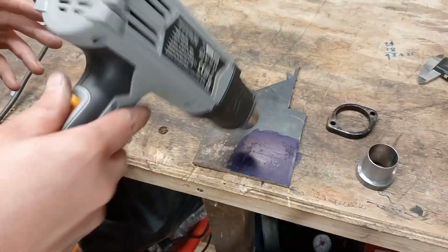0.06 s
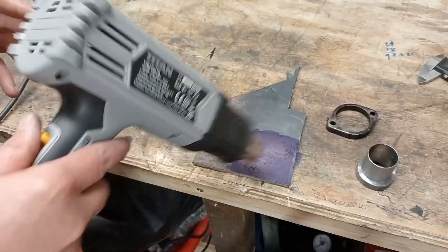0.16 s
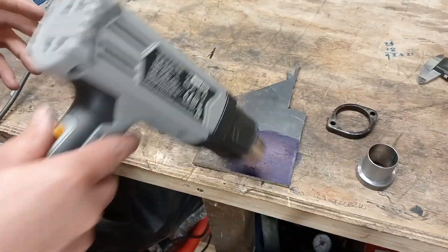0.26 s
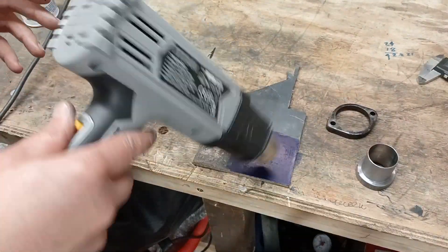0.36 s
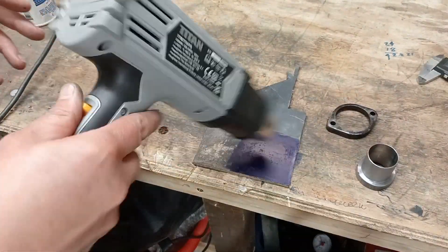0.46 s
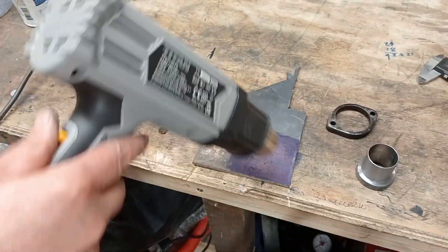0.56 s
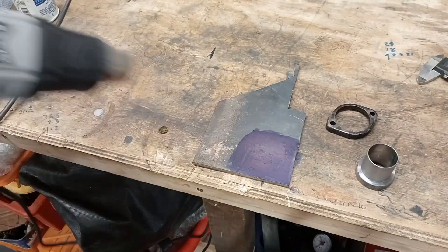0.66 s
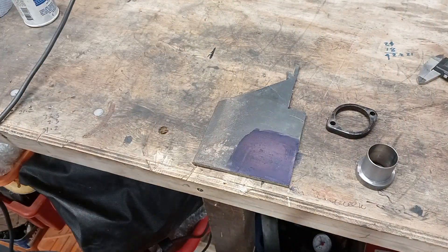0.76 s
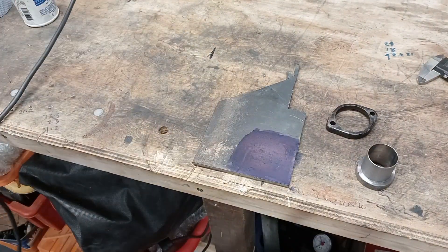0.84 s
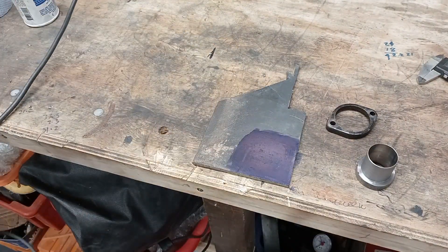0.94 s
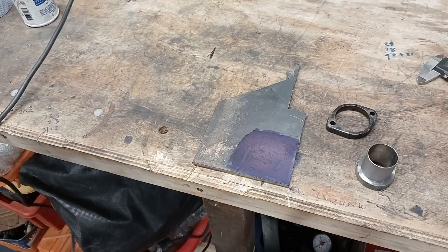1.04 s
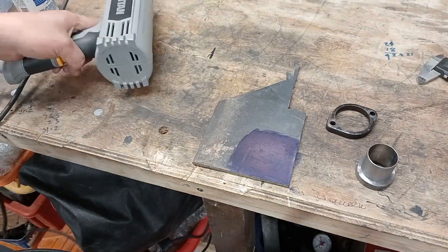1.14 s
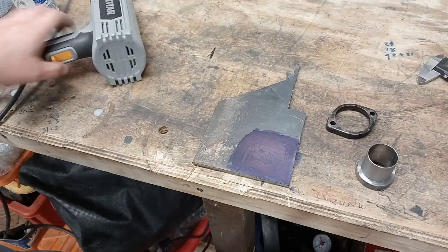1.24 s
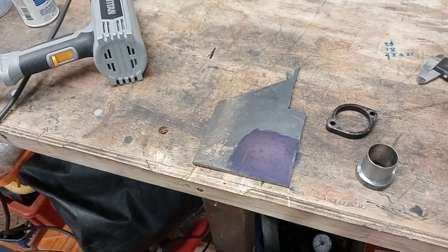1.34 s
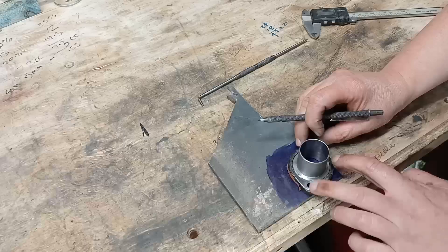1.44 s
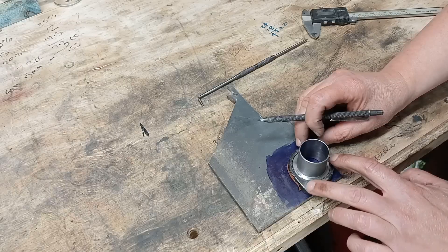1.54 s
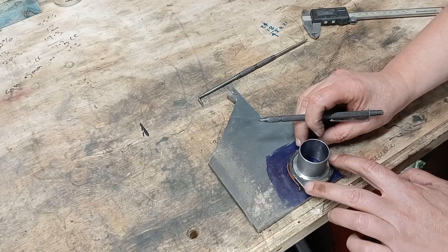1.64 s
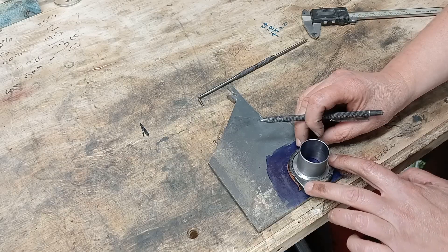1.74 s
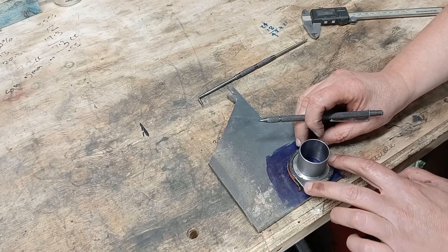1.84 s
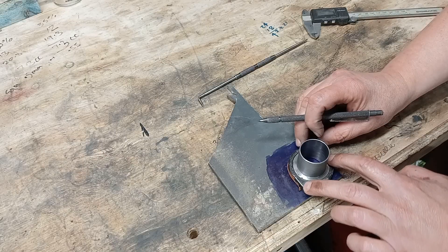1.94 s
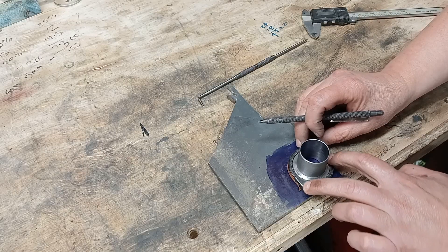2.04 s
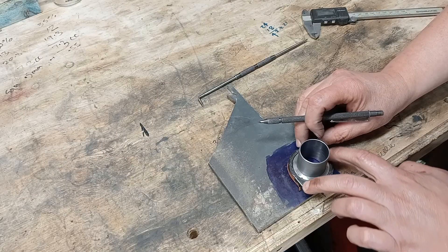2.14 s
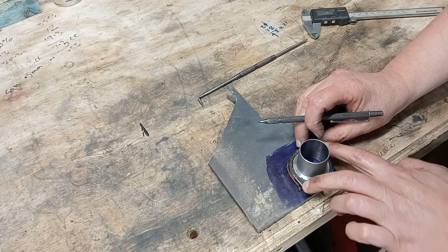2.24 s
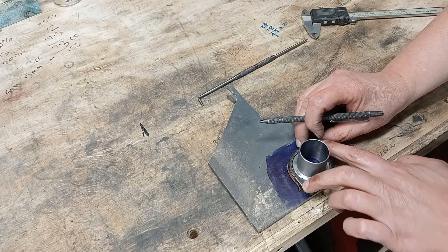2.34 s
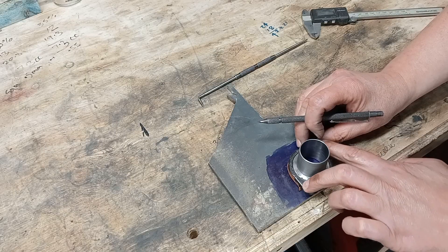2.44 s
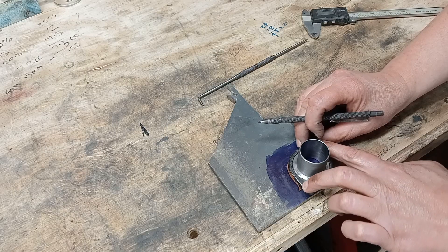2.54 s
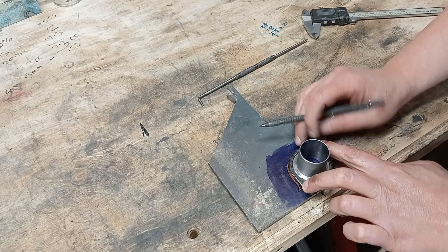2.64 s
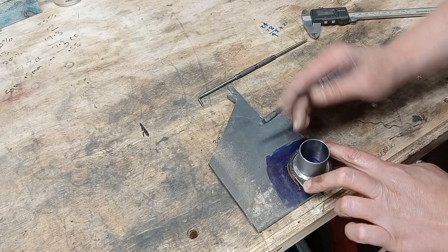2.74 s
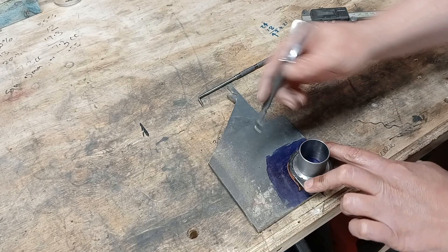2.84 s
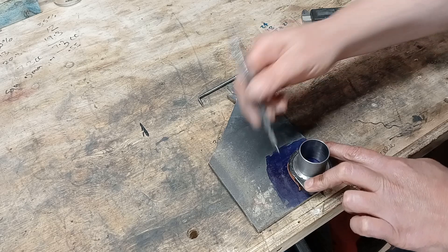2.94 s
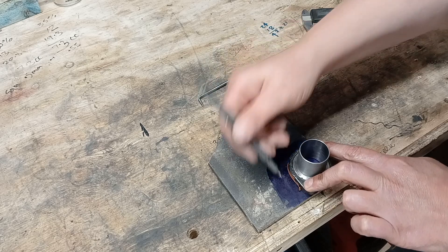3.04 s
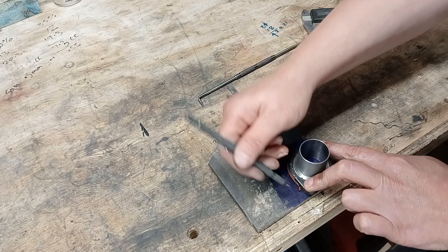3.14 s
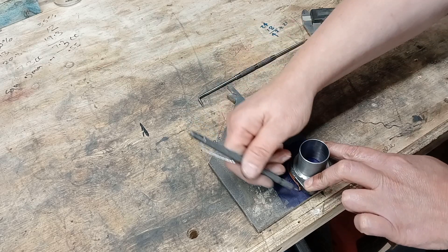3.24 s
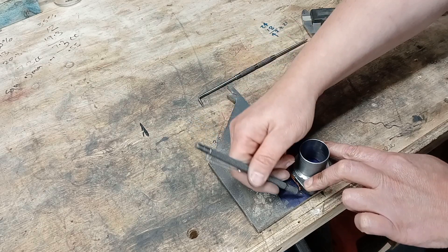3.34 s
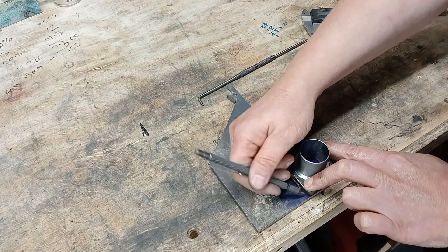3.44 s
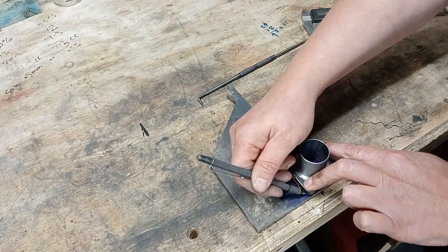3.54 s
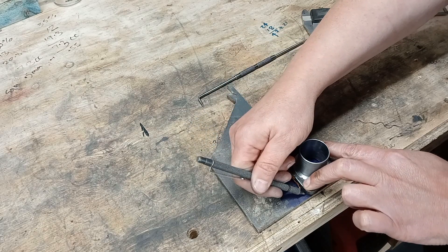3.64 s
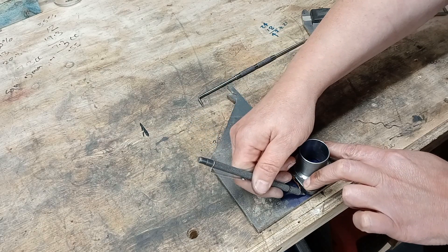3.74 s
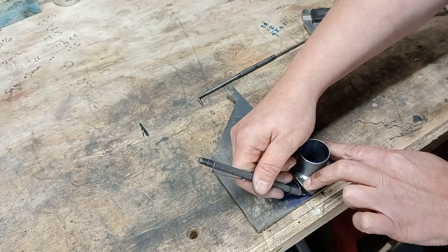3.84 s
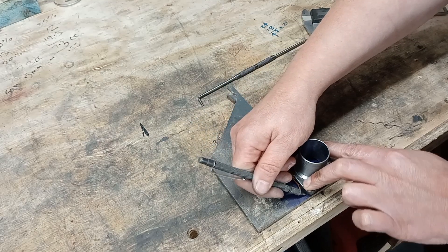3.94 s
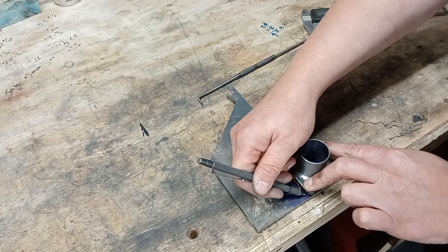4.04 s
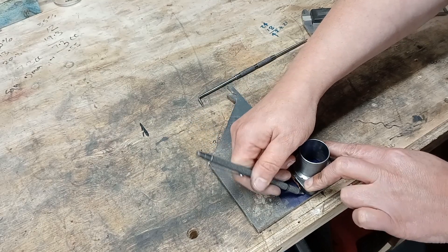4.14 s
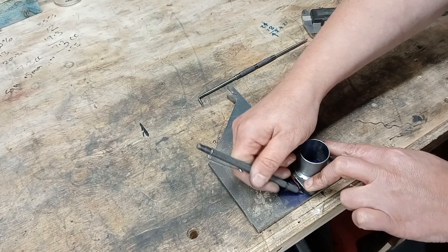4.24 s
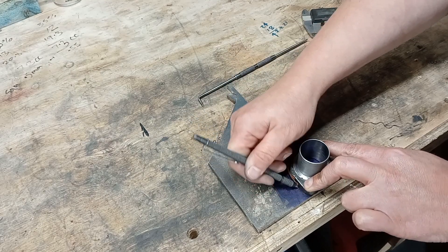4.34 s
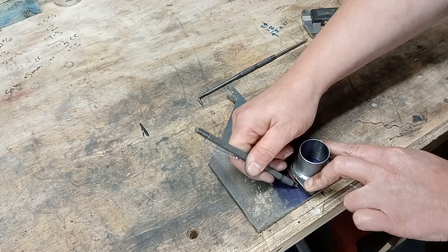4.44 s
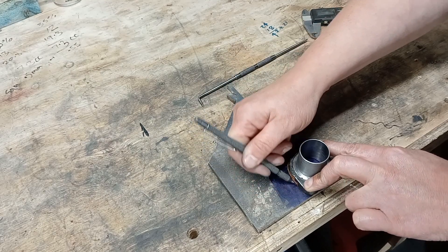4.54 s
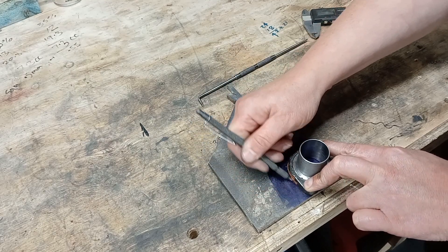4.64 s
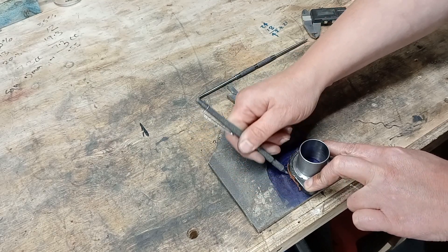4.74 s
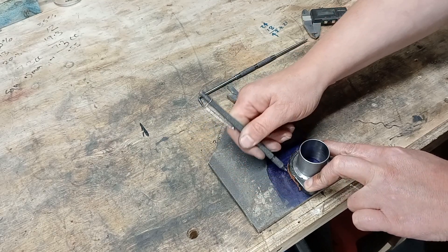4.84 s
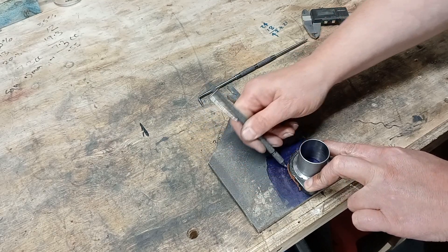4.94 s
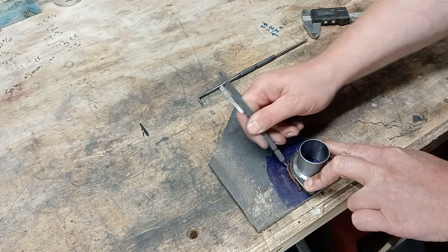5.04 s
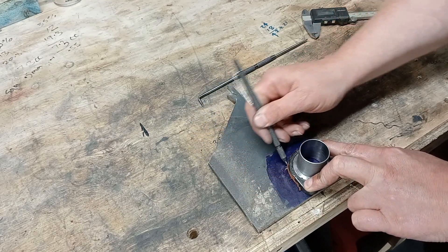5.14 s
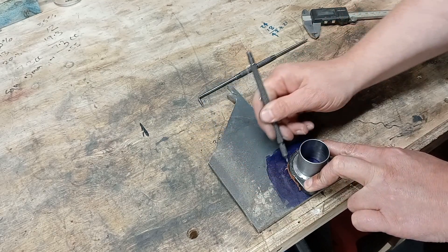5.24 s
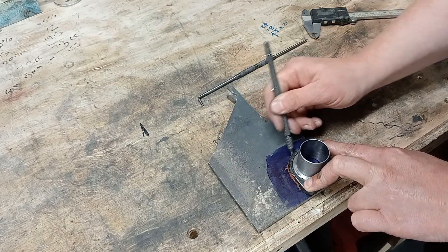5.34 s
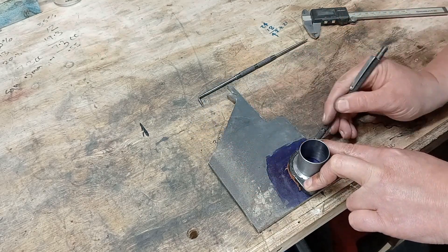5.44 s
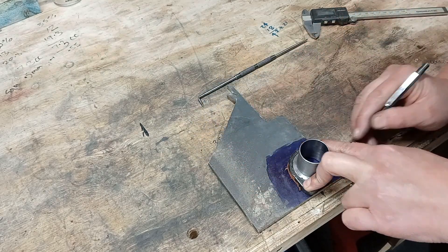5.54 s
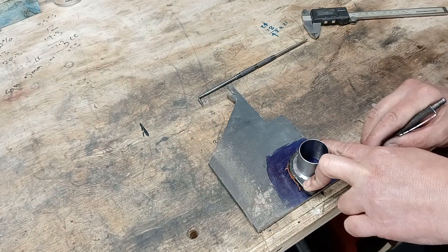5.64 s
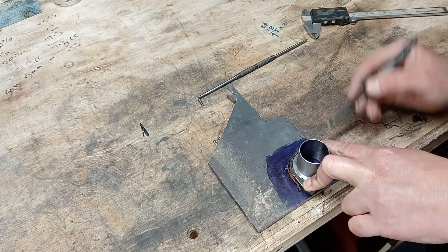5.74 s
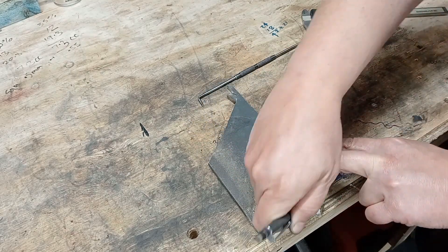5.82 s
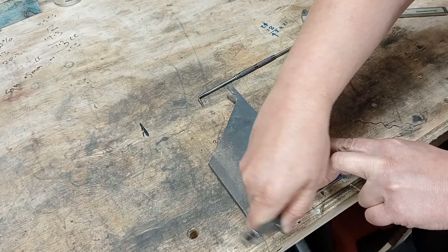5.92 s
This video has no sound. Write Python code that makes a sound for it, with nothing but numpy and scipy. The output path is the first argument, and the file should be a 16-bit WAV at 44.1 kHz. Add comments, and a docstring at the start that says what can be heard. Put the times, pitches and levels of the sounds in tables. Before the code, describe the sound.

Harsh rushing air stops abruptly, a tool clacks onto a wooden bench, then quiet metal scratching ends in a burst of rapid scrapy chirps.

```python
"""Marking out a steel plate on a wooden bench in a small workshop, heard over faint room air and hums.
First, in fast motion, a heat gun dries the layout dye: turbulent noise over motor harmonics, which fade.
The gun clacks onto the bench: decaying noise bursts excite plastic case and wood, all high and short.
At normal speed a scriber touches and scratches round a pipe stub: stick-slip impulses excite steel and boards.
After a moment of silence its last strokes rush by in fast motion, as chirps of the same kind of slip noise."""
import sys
import numpy as np
from scipy import signal
from scipy.fft import rfft, irfft, next_fast_len
from scipy.io import wavfile
from scipy.ndimage import map_coordinates

SR = 44100
rng = np.random.default_rng(int(sys.argv[2]) if len(sys.argv) > 2 else 0)


def transcribe(signal):
    """Save signal, clipped to [-1, 1], as a 16-bit WAV file at the path in sys.argv[1]."""
    frames = np.atleast_2d(signal).T
    limited = np.clip(frames, -1, 1)
    pcm = np.round(limited * 32767).astype(np.int16)
    wavfile.write(sys.argv[1], SR, pcm)


N = 263718  # samples, just under 6 s


def amp(db):
    """Level in decibels to amplitude ratio."""
    return 10 ** (np.asarray(db) / 20)


def unit(x):
    """Normalisation to an rms of 1."""
    return x / np.sqrt(np.mean(x ** 2) + 1e-20)


def clock():
    """Time of every sample, in seconds."""
    return np.arange(N) / SR


def noise(size=N):
    """White noise: equal mean power at every frequency."""
    return rng.standard_normal(size)


def wobble(rate):
    """Slow random modulation: a smooth curve through `rate` random knots a second."""
    knots = noise(size=int(N * rate / SR) + 4)
    return map_coordinates(knots, [clock() * rate])


def along(points, hz):
    """Interpolation of (f/Hz, value) points on a logarithmic frequency axis."""
    f, values = np.transpose(points)
    return np.interp(np.log(hz + 1), np.log(f + 1), values)


def filtered(x, response):
    """Linear filtering: the spectrum of x times a response to frequency."""
    size = next_fast_len(len(x) + 8192)  # room for the filter to ring past the end
    hz = np.fft.rfftfreq(size, 1 / SR)
    return irfft(rfft(x, size) * response(hz), size)[:len(x)]


def shaped(x, response):
    """Filtering normalised so that the power of white noise is unchanged."""
    power = np.mean(np.abs(response(np.linspace(0, SR / 2, 8192))) ** 2)
    return filtered(x, response) / np.sqrt(power)


def coloured(x, spectrum):
    """Spectral shaping by a table of (f/Hz, level/dB)."""
    return shaped(x, lambda hz: amp(along(spectrum, hz)))


def resonate(x, modes, sign=-1):
    """Modal superposition of damped resonances; like signs (1) leave deep valleys between the modes."""
    low_hz = 0.58 * modes[0][0]  # little is radiated below the lowest mode

    def response(f):
        total = 0
        for k, (hz, width, db) in enumerate(modes):
            mode = 1j * f * width / (hz * hz - f * f + 1j * f * width)
            total = total + np.sign(sign) ** k * amp(db) * mode
        return total * f ** 2 / (low_hz ** 2 + f ** 2)

    return shaped(x, response)


def shifting(modes, sway_db, rate):
    """Noise-driven resonances of drifting strength, as the source moves, at rms 1."""
    total = np.zeros(N)
    for hz, width, db in modes:
        strength = amp(db + sway_db * wobble(rate)) * np.sqrt(width)
        total += strength * resonate(noise(), [(hz, width, 0)])
    return unit(total)


def swell(start, end, rise_db_per_s, fall_db_per_s):
    """Exponential envelope: rises until start, holds at 1 until end, then dies away."""
    t = clock()
    rise_db = rise_db_per_s * np.maximum(start - t, 0)
    fall_db = fall_db_per_s * np.maximum(t - end, 0)
    return amp(-rise_db - fall_db)


def grit(rate, spread_db):
    """Stick-slip friction: micro-slips of a point on steel at random instants, of uneven size."""
    slipping = rng.random(N) < rate / SR
    sizes = noise() * amp(spread_db * noise())
    return unit(slipping * sizes)


def struck(s, t60):
    """Contact force as exponentially decaying noise with a sharp onset at s."""
    t = clock() - s
    return noise() * (t >= 0) * amp(-60 * np.abs(t) / t60)


# Reverberation time of the workshop, before division by the speed given to reverb: (f/Hz, t60/s)
WALL_DECAY = [(150, 0.3), (1000, 0.068), (4000, 0.099), (15000, 0.13)]


def reverb(x, speed):
    """Reverberation: convolution with a diffuse tail; the higher the speed, the sooner it dies."""
    hz, t, z = signal.stft(noise(size=SR // 3), SR, nperseg=128)
    decay = amp(-60 * t * speed / along(WALL_DECAY, hz)[:, None])
    tail = signal.istft(z * decay, SR, nperseg=128)[1]
    return signal.fftconvolve(x, tail / np.linalg.norm(tail))[:N]


# Modes of the plate lying on the bench: (f/Hz, width/Hz, relative level/dB)
BENCH_MODES = [(124, 10, -2), (158, 18, 10), (245, 24, -9), (298, 24, -6), (337, 20, 2), (422, 40, -2),
               (508, 30, -5), (658, 24, -2), (716, 18, -1), (1017, 55, -3)]
# Dull boom of the boards under those modes: (f/Hz, relative level/dB)
BOARD_BOOM = [(60, -18), (115, 0.5), (200, 0.5), (450, 4.5), (900, -5), (1200, -39), (2500, -41),
              (5000, -53)]


def bench(force, modes_db=0.5):
    """Forced vibration: the boards boom dully under the plate, with a few modes standing out."""
    boom = coloured(force, BOARD_BOOM)
    modes = resonate(force, BENCH_MODES, sign=1)
    return (boom + amp(modes_db) * modes) / 2


# Spectrum of the room air at normal speed: (f/Hz, relative level/dB)
ROOM_SPECTRUM = [(18, -48.5), (30, -18.5), (123, -4.5), (156, -8.5), (249, -7.5), (518, -12.5), (639, -15),
                 (830, -15), (897, -17), (1400, -18.5), (1910, -20.5), (3150, -21.5), (15500, -35.5)]
# Spectrum of the room air in fast motion: (f/Hz, relative level/dB)
FAST_SPECTRUM = [(30, -16), (200, -22.5), (330, -11), (650, 2), (1100, 2), (2000, -3.5), (4000, -5.5),
                 (8000, -9), (15500, -9)]
# Air in fast motion, before and after the slow work: (start t/s, end t/s, level/dB)
FAST_AIR_SPELLS = [(0, 1.367, -66), (5.39, 5.504, -59), (5.547, 6, -66)]
# Hums that swell and fade: (peak t/s, half-length/s, f/Hz, mean rms level at the peak/dB)
HUM_SWELLS = [(1, .4, 737, -77), (1, .3, 1470, -75), (1.12, .1, 1480, -65), (3.9, 1.5, 123, -75),
              (2.8, 1.2, 245, -77), (5.7, .3, 992, -73), (5.68, .33, 1990, -70)]
# Moment of dead silence: (start t/s, end t/s)
SILENCE = (5.338, 5.407)
ROOM_IN_S, ROOM_RISE_DB_PER_S, ROOM_DB = 1.64, 226, -65.5  # air at normal speed: full from, rise, level
FAST_FADE_DB_PER_S, ABRUPT_DB_PER_S = 150, 5000


def workshop():
    """Broadband background noise with slightly unsteady tonal hums, raised in fast motion."""
    t = clock()
    slow = swell(ROOM_IN_S, SILENCE[0], ROOM_RISE_DB_PER_S, ABRUPT_DB_PER_S)
    air = slow * amp(ROOM_DB + 0.599 * wobble(12)) * coloured(noise(), ROOM_SPECTRUM)
    fast = np.zeros(N)
    for start, end, db in FAST_AIR_SPELLS:
        fast += amp(db) * swell(start, end, ABRUPT_DB_PER_S, FAST_FADE_DB_PER_S)
    fast_air = fast * coloured(noise(), FAST_SPECTRUM)
    hum = np.zeros(N)
    for s, half, hz, db in HUM_SWELLS:
        envelope = np.clip(1 - ((t - s) / half) ** 2, 0, 1)
        tone = np.sin(2 * np.pi * hz * t + 0.8 * wobble(37))
        hum += amp(db + 2.0 * wobble(7.1)) * envelope * tone
    return air + fast_air + np.sqrt(2) * hum  # a sine of rms 1 peaks at root 2


# Harmonics of the motor: (multiple of its frequency, mean rms level/dB)
MOTOR_HARMONICS = [(1, -46.5), (2, -35.5), (5, -31), (7, -39.5)]
# Spectrum of the rushing air: (f/Hz, relative level/dB)
AIR_SPECTRUM = [(30, -35), (150, -36.5), (290, -35), (820, -15), (1700, -12.5), (3000, -10.5), (3700, -4.5),
                (4800, -8), (6800, -2.5), (9000, -6.5), (10500, -7), (11700, 1.5), (13400, -7), (15500, -5)]
# Resonances of barrel and vents: (f/Hz, width/Hz, relative level/dB)
VENT_MODES = [(3000, 90, -7), (3720, 260, -7.5), (4310, 130, -6), (5400, 710, -4), (6600, 220, 0.5),
              (6970, 120, -6), (7780, 130, -1), (11620, 270, -3), (13200, 180, -1), (14600, 350, -8.5)]
MOTOR_HZ = 1996.5
OFF_S, COAST_S = 0.68, 0.26  # switched off at this time; air gone this long afterwards
AIR_DB, AIR_SAG_DB_PER_S, AIR_FALL_DB_PER_S = -24, 3.5, 263.5  # rush: at first, sag, extra fall once off
HISS_DB, HISS_FALL_DB_PER_S = -20.5, 380  # fine hiss: while on, fall once off


def heat_gun(split_hz=8000, vents_db=-3, flutter_db=1.2, drift_hz=1.5):
    """Turbulence noise through resonant vents over motor harmonics; the fine hiss dies faster than the rush."""
    t = clock()
    coasting = np.maximum(t - OFF_S, 0)
    air_db = AIR_DB - AIR_SAG_DB_PER_S * t - AIR_FALL_DB_PER_S * coasting
    hiss_db = HISS_DB - HISS_FALL_DB_PER_S * coasting
    # waving the gun about shifts the strength of each vent
    vents = shifting(VENT_MODES, sway_db=3.0, rate=70)
    air = coloured(noise(), AIR_SPECTRUM) + amp(vents_db) * vents
    body = filtered(air, lambda hz: 1 / (1 + (hz / split_hz) ** 8))
    rush = amp(air_db + 0.96 * wobble(60)) * unit(body)
    rush += amp(hiss_db + 1.4 * wobble(60)) * unit(air - body)

    motor_hz = MOTOR_HZ + drift_hz * wobble(8) + 1.9 * wobble(120)
    phase = 2 * np.pi * np.cumsum(motor_hz) / SR
    whine = np.zeros(N)
    for multiple, db in MOTOR_HARMONICS:
        # each harmonic flutters in the turbulent air
        whine += np.sqrt(2) * amp(db + 2.9 * wobble(90)) * np.sin(round(multiple) * phase)

    powered = np.clip((OFF_S - t) / 0.074 + 0.34, 0, 1)
    turning = np.clip((COAST_S - coasting) / 0.022, 0, 1)
    return turning * rush * amp(flutter_db * wobble(250)) + powered * whine


# Knocks of the gun's plastic case: (t/s, bench level/dB, case level/dB, crack level/dB), before filtering
GUN_KNOCKS = [(1.103, -58, -31, -38.5), (1.184, -43.5, -36.5, -30), (1.261, -37, -22.5, -32.5),
              (1.2703, -14, -19.5, -16.5), (1.275, -31, -19, -26.5), (1.3187, -48.5, -46.5, -45.5),
              (1.3248, -47, -46.5, -40.5)]
# Modes of the bench under the gun: (f/Hz, width/Hz, relative level/dB)
THUD_MODES = [(370, 35, -17.5), (480, 130, -9), (814, 27, -4), (977, 130, 5), (1256, 61, 2.5),
              (1440, 73, -6)]
# Spectrum of the ringing case: (f/Hz, relative level/dB)
CASE_SPECTRUM = [(600, -36.5), (1200, -10.5), (2100, 3.5), (2800, -3), (3600, -7.5), (7000, -37)]
# Spectrum of the contact crack: (f/Hz, relative level/dB)
CRACK_SPECTRUM = [(1500, -36.5), (3000, -3.5), (3900, 2), (6000, -7), (10000, -3), (15500, -5.5)]
THUD_LOW_HZ = 284  # in fast motion the knocks have little bass below this


def clacks(bench_t60=0.036, case_t60=0.021, crack_t60=0.038, room_db=-16):
    """Impact excitation: each contact cracks, rings the plastic case briefly and thuds in the bench."""
    wood, case, crack = np.zeros(N), np.zeros(N), np.zeros(N)
    for s, bench_level, case_level, crack_level in GUN_KNOCKS:
        wood += amp(bench_level) * struck(s, bench_t60)
        case += amp(case_level) * struck(s, case_t60)
        crack += amp(crack_level) * struck(s, crack_t60)
    out = resonate(wood, THUD_MODES, sign=1)
    out += coloured(case, CASE_SPECTRUM) + coloured(crack, CRACK_SPECTRUM)
    highpass = signal.butter(4, THUD_LOW_HZ, 'highpass', fs=SR, output='sos')
    out = signal.sosfilt(highpass, out)
    return out + amp(room_db) * reverb(out, speed=1.3)


# Light touches of scriber and fingers:
# (t/s, level of the force/dB, ring f/Hz, decay t60/s, relative bench level/dB)
LIGHT_TOUCHES = [(2.243, -70.5, 8900, 0.27, -60.5), (2.646, -62, 8300, 0.015, -66),
                 (2.662, -73, 8400, 0.024, -60.5), (2.689, -58, 8500, 0.011, -60.5),
                 (2.709, -59, 8650, 0.018, -74), (2.855, -50.5, 8500, 0.0077, -64),
                 (3.898, -49.5, 6640, 0.046, -43.5), (3.899, -52.5, 2043, 0.11, -64),
                 (4.123, -36, 965, 0.045, -53.5), (4.1223, -46, 2570, 0.063, -53),
                 (4.233, -66, 8250, 0.042, -53.5)]


def touches(damping=0.25, bumps_db=-1.5):
    """Damped resonance: each small contact excites one well damped ring and a soft bump of the bench."""
    rings, bumps = np.zeros(N), np.zeros(N)
    for s, db, hz, t60, bench_db in LIGHT_TOUCHES:
        width = damping * hz

        def ring(f):
            return (1j * f * width / (hz ** 2 - f ** 2 + 1j * f * width)) ** 2

        rings += amp(db) * shaped(struck(s, t60), ring)
        bumps += amp(bench_db + bumps_db) * struck(s, t60=0.13)
    return rings + bench(bumps)


# Resonances of scriber and plate: (f/Hz, width/Hz, relative level/dB)
STEEL_MODES = [(2068, 110, 6), (2780, 120, 2), (3980, 280, 1), (4600, 150, -1.5), (5460, 170, -3.5),
               (6980, 230, 1), (8540, 970, -3)]
# Spectrum of the scratching tip: (f/Hz, relative level/dB)
SCRATCH_SPECTRUM = [(500, -19), (1000, -4), (1400, -9), (2400, -2), (3300, -4), (4200, -1), (6000, -6.5),
                    (8800, -9.5), (11000, -18), (15500, -29)]
# Strokes of the scriber:
# (t of full pressure/s, hold/s, relative bench rumble level/dB, relative tip scratch level/dB)
SCRIBER_STROKES = [(2.28, 0.053, -68, -72.5), (2.765, .003, -69, -64), (3.014, .025, -73, -65),
                   (3.114, 0.041, -64, -63), (3.22, .12, -72, -71.5), (3.945, .05, -56.5, -69),
                   (4.242, 0.056, -59.5, -65.5), (4.418, 0.022, -37, -41.5), (4.47, 0.0061, -46.5, -59.5),
                   (4.62, 0.048, -49, -56), (4.811, .025, -43.5, -47), (4.874, 0.0088, -50.5, -51.5),
                   (4.948, .05, -57, -60.5), (5.027, 0.0098, -44.5, -50.5), (5.12, 0.16, -75, -67),
                   (5.198, 0.025, -56.5, -66.5)]
PRESS_DB_PER_S, EASE_DB_PER_S = 440, 210  # every stroke bites quickly and eases off slowly


def scribing(rumble_db=-3.0, tip_db=-1, ring_db=2, chatter_db=1.77):
    """Stick-slip friction: tiny slips of the point ring the steel and rumble in the bench below."""
    chatter = amp(chatter_db * wobble(130))
    slips = grit(7000, 2.5)
    ring = shifting(STEEL_MODES, sway_db=2.5, rate=12)
    rumble = unit(bench(slips * chatter))
    scratch = unit(chatter * (coloured(slips, SCRATCH_SPECTRUM) + amp(ring_db) * ring))
    on_bench, on_tip = np.zeros(N), np.zeros(N)
    for s, hold, bench_level, tip_level in SCRIBER_STROKES:
        pressure = swell(s, s + hold, PRESS_DB_PER_S, EASE_DB_PER_S)
        # overlapping strokes add in power
        on_bench = np.hypot(on_bench, amp(bench_level) * pressure)
        on_tip = np.hypot(on_tip, amp(tip_level) * pressure)
    return amp(rumble_db) * on_bench * rumble + amp(tip_db) * on_tip * scratch


# Hurried strokes and clicks of the scriber:
# (t/s, length/s, level of the force/dB, main ring f/Hz, high zing level above the force/dB)
HURRIED_STROKES = [(5.423, 0.021, -41, 4340, -37), (5.449, 0.0011, -44, 3230, -17),
                   (5.46, 0.014, -43.5, 4630, -24), (5.514, 0.004, -53, 5460, -18),
                   (5.545, 0.0075, -29.5, 5400, -27), (5.583, 0.0017, -47.5, 2980, -18),
                   (5.605, 0.0076, -29.5, 4000, -22), (5.652, 0.00086, -43, 2880, -3),
                   (5.702, 0.0051, -45, 3500, -18), (5.713, 0.0017, -48, 3570, 0),
                   (5.739, 0.0083, -30.5, 3270, -14), (5.786, 0.00063, -29, 3020, -7),
                   (5.797, 0.0051, -33, 3480, -8), (5.83, 0.00062, -48, 3620, 4.5),
                   (5.948, 0.00075, -51.5, 3430, -32), (5.972, 0.0024, -55.5, 1940, -29)]
# Resonances they share: (f/Hz, width/Hz, relative level/dB)
FLICK_MODES = [(513, 76, -5), (1273, 87, 3), (2020, 200, 0), (2430, 88, -1), (2760, 134, 12.5),
               (3450, 140, 9), (3790, 47, 11), (4060, 66, -24), (4800, 120, -11), (5530, 360, 1.5),
               (7100, 130, -25), (8160, 110, 2.5), (14100, 900, -14)]
# Spectrum of their rasp: (f/Hz, relative level/dB)
RASP_SPECTRUM = [(120, -87), (200, -71.5), (315, -35.5), (1280, -12), (1590, -14.5), (2750, -10),
                 (5910, -9.5), (7620, -15.5), (13600, -9), (15500, -21)]


def flicks(rasp_db=-6.0, modes_db=-4.5, main_db=-5, damping=0.12, zing_hz=11400, zing_width_hz=450,
           release_t60=0.025, softness=0.026, room_db=-16):
    """Time compression: whole strokes shrink to chirps of slip noise; longer strokes start more softly."""
    t = clock()
    drag, rings, zing = np.zeros(N), np.zeros(N), np.zeros(N)
    slips = grit(20000, 3)
    for s, length, db, hz, zing_db in HURRIED_STROKES:
        rise_db = np.maximum(s - t, 0) / (softness * length)
        fall_db = 60 * np.maximum(t - s - length, 0) / release_t60
        force = amp(db - np.minimum(rise_db + fall_db, 200)) * slips
        drag += force
        zing += amp(zing_db) * force
        # each spot of the plate favours its own ring
        rings += resonate(force, [(hz, damping * hz, 0)])
    out = amp(rasp_db) * coloured(drag, RASP_SPECTRUM)
    out += amp(modes_db) * resonate(drag, FLICK_MODES, sign=1)
    out += amp(main_db) * rings
    out += resonate(zing, [(zing_hz, zing_width_hz, 0)])
    return out + amp(room_db) * reverb(out, speed=2.2)


def scene():
    """Linear superposition of all sources, with a moment of dead silence before the last strokes."""
    hand_work = touches() + scribing()
    hand_echo = amp(-7.0) * reverb(hand_work, speed=0.48)
    sound = workshop() + heat_gun() + clacks() + hand_work + hand_echo + flicks()
    outside_s = np.maximum(SILENCE[0] - clock(), clock() - SILENCE[1])
    audible = np.clip(outside_s / 0.002 + 1, 0, 1)  # 2 ms fades just inside the silence
    return (audible * sound)[None]


TOP_HZ = 15700


def record(dry):
    """Band limitation: a low-pass with a 500 Hz wide slope centred on the limit."""
    return filtered(dry[0], lambda hz: np.clip((TOP_HZ - hz) / 500 + 0.5, 0, 1))[None]


dry = scene()
out = record(dry)
transcribe(out)
```